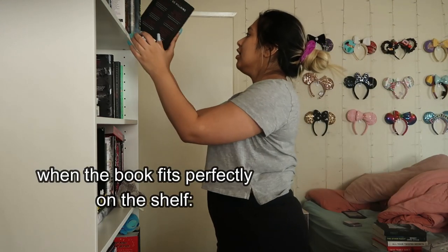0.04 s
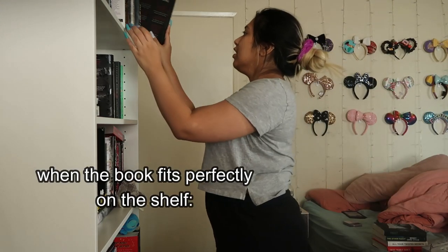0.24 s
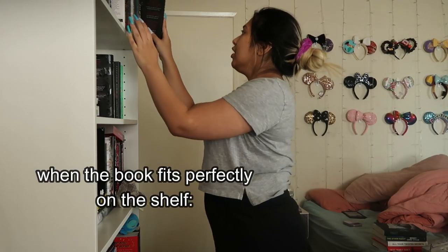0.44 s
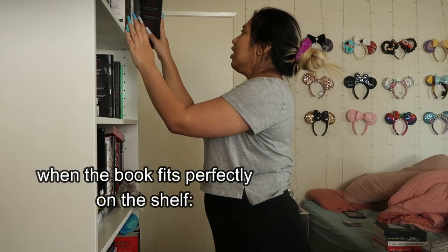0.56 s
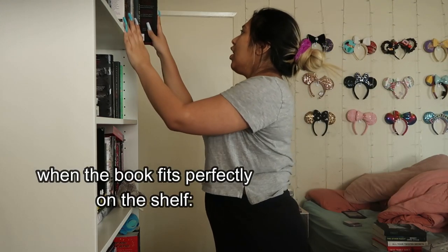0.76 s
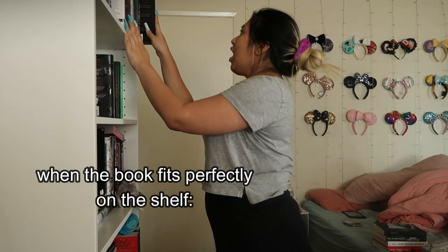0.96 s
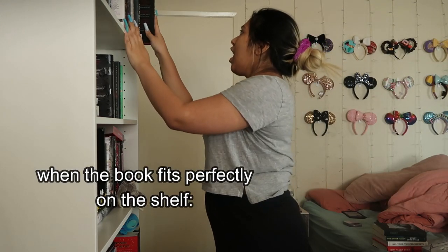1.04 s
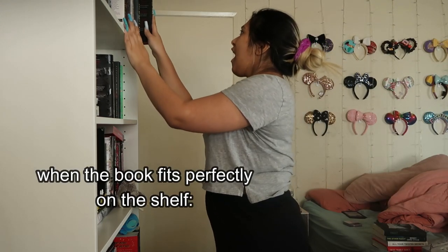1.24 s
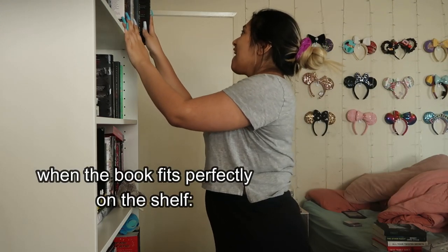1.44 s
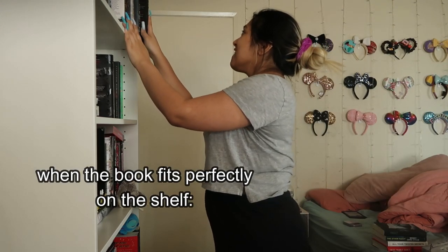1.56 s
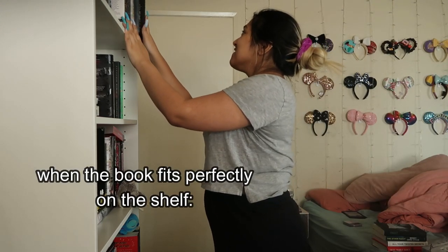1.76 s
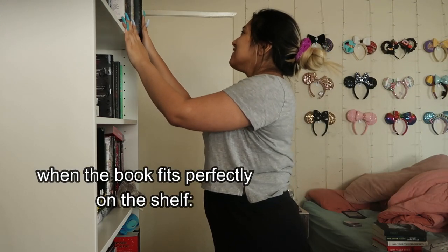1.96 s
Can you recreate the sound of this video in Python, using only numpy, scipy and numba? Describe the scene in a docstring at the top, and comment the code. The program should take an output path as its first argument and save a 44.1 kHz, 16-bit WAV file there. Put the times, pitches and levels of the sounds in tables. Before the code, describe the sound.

A hardback book slides into a tight shelf gap with papery rubbing, a knock and bumps.

```python
"""A hardback book knocks and softly bumps on a wooden shelf as it is pushed into a tight gap.
Its stiff cover rings at the knock; its pages thud and set the shelf ringing. Many tiny slips of
paper fibres make the cover rub and hiss along the next books and the bottom edge scrape the board.
The bookcase rumbles. Around it is a quiet bedroom: a short echo, mains hum and faint room noise."""
import sys
import numpy as np
from scipy import signal
from scipy.fft import rfft, irfft
from scipy.io import wavfile
from numba import njit

SR = 44100
rng = np.random.default_rng(int(sys.argv[2]) if len(sys.argv) > 2 else 0)


def persist_wave(psi):
    """Save psi, clipped to +-1, as 16-bit WAV."""
    counts = np.round(np.clip(psi, -1, 1) * 32767).astype(np.int16)
    wavfile.write(sys.argv[1], SR, np.atleast_2d(counts).T)


N = 88200
TIME_S = np.arange(N) / SR


def gain(db):
    """Turn decibels into a number to multiply by."""
    return 10 ** (np.asarray(db) / 20)


def normalise(x):
    """Scale a signal so that its average strength (rms) is 1."""
    return x / np.sqrt(np.mean(x ** 2))


def curve(table, column=1):
    """Join a table's points in time with straight lines."""
    rows = np.array(table)
    return np.interp(TIME_S, rows[:, 0], rows[:, column])


def fade(ring_s):
    """Die away by 60 dB in ring_s seconds."""
    return np.exp(-np.log(1000) * TIME_S / ring_s)


def shape_tone(x, points):
    """Turn pitches up or down along a line of (pitch_hz, gain_db) points."""
    hz, db = np.array(points).T
    grid_hz = np.maximum(np.fft.rfftfreq(2 * N, 1 / SR), 1)
    cepstrum = irfft(np.log(gain(np.interp(np.log(grid_hz), np.log(hz), db))))
    # fold the filter so that it never sounds before its input
    cepstrum[1:N] *= 2
    cepstrum[N + 1:] = 0
    return irfft(rfft(x, 2 * N) * np.exp(rfft(cepstrum)))[:N]


def start_at(start_s, x):
    """Delay a sound to its start time."""
    return np.pad(x, (int(start_s * SR), 0))[:N]


def wander(rate_hz):
    """Drift at random by about 1, turning rate_hz times a second."""
    return normalise(np.interp(TIME_S * rate_hz, np.arange(N), rng.standard_normal(N)))


@njit
def bandpass(x, pitch_hz, width_hz):
    """Let through the sound near one pitch, which may move."""
    out, band_state, low_state = np.empty(len(x)), 0., 0.
    for i in range(len(x)):
        tuning = np.tan(np.pi * pitch_hz[i] / SR)
        damping = width_hz / pitch_hz[i]
        band = (band_state + tuning * (x[i] - low_state)) / (1 + tuning * (tuning + damping))
        band_state = 2 * band - band_state
        low_state += 2 * tuning * band
        out[i] = damping * band
    return out


def ringing(tones):
    """A tapped object rings with several fading tones."""
    return sum(gain(db) * np.sin(2 * np.pi * hz * TIME_S) * fade(ring_s) for hz, db, ring_s in tones)


# How much the two ears differ at each pitch: pitch_hz, gain_db
STEREO_WIDTH = [(50, -32), (110, -21.5), (250, -7), (600, -7.5), (1300, -3.5), (2600, -2.5), (4300, -1.5),
                (8000, -3), (14000, -1.5)]

def stereo(middle, side, side_db=0):
    """Make left and right: alike in the bass, wide in the treble."""
    side = gain(side_db) * shape_tone(side, STEREO_WIDTH)
    return np.array([middle + side, middle - side])


# Tone of the room's noise: pitch_hz, relative_db
ROOM_TONE = [(20, -6), (35, -17), (55, 4), (80, -6), (110, 0.5), (170, -6), (240, -5.5), (305, -7.5),
             (380, -7.5), (500, -12), (640, -14), (800, -11.5), (1300, -19.5), (2500, -24), (4000, -29.5),
             (7000, -32), (10000, -37.5), (15000, -49.5)]

def room_noise(level_db=-53.5):
    """Faint, low, steady noise fills the bedroom."""
    middle, side = (normalise(shape_tone(rng.standard_normal(N), ROOM_TONE)) for _ in range(2))
    return gain(level_db) * stereo(middle, side, side_db=5.5)


# Mains hum, and a very faint, thin, high tone: pitch_hz, level_db
MAINS_HUM = [(59.4, -58), (120, -80), (360, -66.5)]
FAINT_HIGH_TONE = [(13001, -92)]

def hum_and_high_tone(waver_db=2, waver_hz=6):
    """The mains hums beside a very faint, thin, high tone; each tone wavers slightly in level."""
    out = np.zeros(N)
    for hz, db in MAINS_HUM + FAINT_HIGH_TONE:
        peak = np.sqrt(2) * gain(db - waver_db * wander(waver_hz))
        out += peak * np.sin(2 * np.pi * (hz * TIME_S + rng.random()))
    return out


def with_echo(x, echo_db, ring_s=.23, build_s=.0086, widen_s=.04):
    """Add the bedroom's short echo, which starts in front and widens."""
    tail = normalise((1 - np.exp(-TIME_S / build_s)) * fade(ring_s)) / np.sqrt(N)
    widening = 1 - np.exp(-TIME_S / widen_s)
    middle = signal.fftconvolve(x, tail * rng.standard_normal(N))[:N]
    side = signal.fftconvolve(x, tail * widening * rng.standard_normal(N))[:N]
    return x + gain(echo_db) * stereo(middle, side, side_db=-4)


def slips(slips_per_s=12000):
    """Paper fibres slip in tiny clicks, so many that they blur into noise."""
    return (rng.random(N) < slips_per_s / SR) * rng.standard_normal(N)


def grainy_noise(tone, side_db=0):
    """A stereo stream of tiny clicks, shaped to one tone."""
    middle, side = (normalise(shape_tone(slips(), tone)) for _ in range(2))
    return stereo(middle, side, side_db)


def rasp(pitch_hz, width_hz):
    """Slips ring in a narrow band around one pitch."""
    return normalise(bandpass(bandpass(slips(), pitch_hz, width_hz), pitch_hz, width_hz))


# Tone of the bookcase's rumble: pitch_hz, relative_db
RUMBLE_TONE = [(25, -30), (45, 4), (70, 2.5), (125, 9), (180, -16), (300, -22), (600, -20), (2000, -55)]
# How loud it is: time_s, level_db
RUMBLE_LEVELS = [(0, -62), (.25, -60), (.3, -46), (.39, -57), (.46, -56), (.52, -53.5), (.58, -62.5),
                 (.64, -54.5), (.9, -66.5), (1.2, -73), (2, -88)]

def bookcase_rumble():
    """The bookcase rumbles while the book is wedged in."""
    return grainy_noise(RUMBLE_TONE) * gain(curve(RUMBLE_LEVELS))


# Tone of the edge scraping the board: pitch_hz, relative_db
SCRAPE_TONE = [(100, -15.5), (250, 5), (600, -8.5), (1200, -4), (2200, -0.5), (3300, -3), (5000, -10.5),
               (7000, -22.5), (10000, -33), (15000, -65)]
# How loud it is: time_s, level_db
SCRAPE_LEVELS = [(0, -69), (.2, -72), (.28, -64.5), (.33, -58.5), (.43, -51), (.52, -64), (.6, -61.5),
                 (.7, -57), (.78, -62), (.9, -63), (1.17, -68), (1.42, -59), (1.54, -55), (1.63, -57.5),
                 (1.66, -50.5), (1.72, -50), (1.755, -56), (1.89, -63.5), (2, -54.5)]

def edge_scrape(judder_db=2, judder_hz=70):
    """The bottom edge scrapes unevenly over the board, sounding fuller than the covers."""
    scrape = grainy_noise(SCRAPE_TONE, side_db=-10.5)
    return scrape * gain(curve(SCRAPE_LEVELS) + judder_db * wander(judder_hz))


# Tone of the covers' hiss: pitch_hz, relative_db
HISS_TONE = [(1500, -29), (3000, -8.5), (4400, -2.5), (6000, -8.5), (9000, -17.5), (15000, -49)]
# How loud it is: time_s, level_db
HISS_LEVELS = [(0, -66), (.05, -74), (.11, -64), (.27, -58), (.37, -60), (.5, -73), (.65, -76), (1, -77),
               (1.6, -78), (1.66, -68), (1.72, -63), (1.77, -74)]

def cover_hiss():
    """The covers hiss brightly on the quick entry and on the last push."""
    return grainy_noise(HISS_TONE) * gain(curve(HISS_LEVELS))


# Moments when the cover catches: middle_s, length_s, level_db, pitch_hz
COVER_CATCHES = [(.265, 0.1, -53.5, 2570), (0.275, 0.11, -59.5, 4100), (0.59, .05, -58.5, 3640),
                 (0.606, 0.073, -58.5, 1950), (0.878, 0.041, -60.5, 3560), (1.705, .06, -58.5, 2150),
                 (1.783, 0.077, -62, 1900)]

def cover_catches():
    """Where the cover grips, its slips swell into a brief rasp."""
    out = np.zeros(N)
    for middle_s, length_s, db, hz in COVER_CATCHES:
        swell = np.cos(np.pi * np.clip((TIME_S - middle_s) / length_s, -.5, .5))
        out += gain(db) * rasp(np.full(N, float(hz)), width_hz=450.) * swell
    return with_echo(out, echo_db=-10)


# Tone of cover rubbing on cover: pitch_hz, relative_db
RUB_TONE = [(300, -17), (1300, -11), (2300, 1.5), (3200, 4), (4800, -5.5), (6500, -17), (9000, -23),
            (15000, -35)]
# How the rub changes as the book goes in: time_s, level_db, pitch_hz
RUB_PATH = [(0, -69, 3500), (.04, -70, 3380), (.085, -55.5, 3580), (.15, -51, 3530), (.21, -55.5, 3200),
            (.27, -52.5, 3370), (.33, -56, 3100), (.42, -58, 3060), (.51, -55.5, 2880), (.6, -55, 3100),
            (.72, -53.5, 2830), (.77, -56, 2840), (.83, -54, 2940), (.87, -52.5, 3250), (.93, -59.5, 3000),
            (.99, -69.5, 2870), (1.05, -59, 2860), (1.17, -72.5, 2770), (1.29, -56, 3000),
            (1.38, -64, 2900), (1.7, -61, 3400), (1.88, -62.5, 3150), (2, -70, 2830)]

def cover_rub(judder_db=1, judder_hz=50, pitch_waver=.049, waver_hz=25, rasp_db=-2):
    """The cover slips along the next book, with a papery rasp whose pitch shifts and wavers."""
    pitch_hz = curve(RUB_PATH, column=2) * np.exp(pitch_waver * wander(waver_hz))

    def rub():
        rustle = normalise(shape_tone(slips(), RUB_TONE))
        return normalise(rustle + gain(rasp_db) * rasp(pitch_hz, width_hz=480.))
    rubbing = stereo(rub(), rub(), side_db=-15.5)
    return rubbing * gain(curve(RUB_PATH) + judder_db * wander(judder_hz))


# Tones the wooden shelf rings with: pitch_hz, relative_db, ring_s
SHELF_TONES = [(123, -10, .28), (157, -7, .24), (236, -7.5, .16), (312, -17, .13), (402, -2, .14),
               (487, -16, .1), (667, -8, .14), (778, -14, .15), (845, -13, .12), (965, -8, .11),
               (1513, -13, .11)]
# Blurred ringing of the bookcase and the other books: pitch_hz, relative_db
BOOKCASE_TONE = [(60, -5.5), (130, 0), (225, 2), (305, 1), (400, 0.5), (600, -16), (1000, -11.5),
                 (1400, -14.5), (2200, -20.5), (4000, -20), (10000, -51.5)]
# Bumps of the book on the shelf: start_s, thud_db, pitch_hz, rise_s, relative_ring_db
BOOK_BUMPS = [(0.3472, -31, 183, .003, -1.5), (.3565, -32, 223, 0.0035, -27),
              (0.4103, -37, 164, 0.0015, -22), (.651, -42, 239, .0045, -18),
              (1.066, -41.5, 170, 0.0011, -22.5), (1.412, -43, 142, 0.0011, -29),
              (1.424, -47, 560, 0.0018, -30), (1.4305, -36, 203, 0.0022, -23),
              (1.458, -44, 210, 0.0016, -25)]

def book_bumps(shelf_db=-29.5, case_db=-32.5, build_s=.005):
    """The block of pages gives a dull thud; the shelf and the full bookcase ring on after it."""
    build = 1 - np.exp(-TIME_S / build_s)
    shelf_ring = gain(shelf_db) * ringing(SHELF_TONES) * build
    case_fade = gain(case_db) * build * fade(ring_s=.24)
    bumps, case_power = np.zeros(N), np.zeros(N)
    for start_s, thud_db, hz, rise_s, ring_db in BOOK_BUMPS:
        swell = TIME_S / rise_s * np.exp(1 - np.minimum(TIME_S / rise_s, 50))
        thud = gain(thud_db) * swell * np.sin(2 * np.pi * hz * TIME_S)
        bumps += start_at(start_s, thud + gain(ring_db) * shelf_ring)
        case_power += start_at(start_s, gain(ring_db) * case_fade) ** 2
    bumps = with_echo(bumps, echo_db=-12.5)
    case_ring = grainy_noise(BOOKCASE_TONE, side_db=-11) * np.sqrt(case_power)
    return bumps + case_ring


# Tones the stiff cover rings with: pitch_hz, relative_db, ring_s
COVER_TONES = [(1020, 8, 0.0036), (1450, -2.5, 0.023), (1734, -2, 0.01), (2000, -9.5, 0.015),
               (1940, -1, 0.016), (2480, -12.5, 0.013), (2880, -20, 0.015)]
# Tone of its edge chattering on the shelf: pitch_hz, gain_db
CHATTER_TONE = [(100, -89), (450, -3), (950, 3.5), (1250, -4.5), (1600, -2), (2150, 3), (2850, -2),
                (3500, -20.5), (5200, -18.5), (8000, -28.5), (15000, -55)]
# Quick taps that make up the knock: start_s, relative_db, pitch_ratio
EDGE_TAPS = [(.3445, .5, 1), (.3464, 3, 1.03), (.3497, -5.5, 1.25), (.3533, -4, 1.45)]

def book_knock(chatter_s=.0031, chatter_db=-5.5, ring_db=-36.5, ring_top_hz=3230):
    """The cover's edge lands in quick taps; each chatters and rings it, higher as it is pressed down."""
    soften = signal.butter(4, ring_top_hz, fs=SR, output="sos")
    out = np.zeros(N)
    for start_s, tap_db, pitch_ratio in EDGE_TAPS:
        tones = [(hz * pitch_ratio, db, ring_s) for hz, db, ring_s in COVER_TONES]
        cover_ring = gain(ring_db) * signal.sosfilt(soften, ringing(tones))
        burst = normalise(rng.standard_normal(N) * np.exp(-TIME_S / chatter_s)) / np.sqrt(N)
        chatter = gain(chatter_db) * shape_tone(burst, CHATTER_TONE)
        out += gain(tap_db) * start_at(start_s, chatter + cover_ring)
    return with_echo(out, echo_db=-10)


def scene():
    """The book slides, knocks and bumps into place in the quiet room."""
    sliding = cover_hiss() + cover_rub() + cover_catches() + edge_scrape()
    return sliding + bookcase_rumble() + book_knock() + book_bumps() + room_noise() + hum_and_high_tone()


def record(dry, top_hz=15100):
    """Cut away the very highest treble."""
    return signal.sosfilt(signal.ellip(10, .2, 70, top_hz, fs=SR, output="sos"), dry)


dry = scene()
out = record(dry)
persist_wave(out)
```